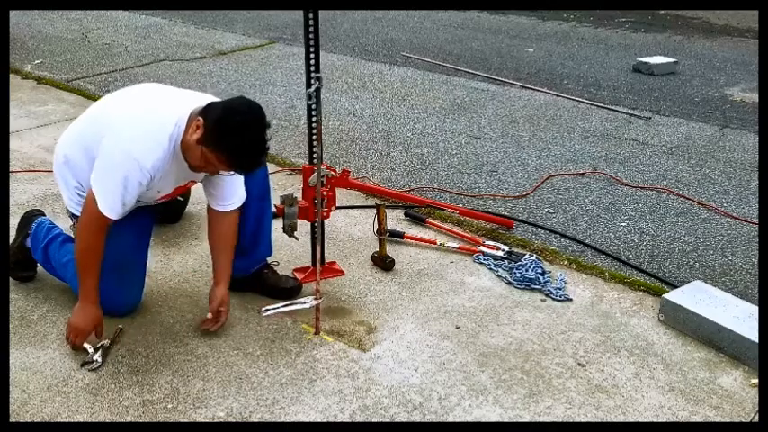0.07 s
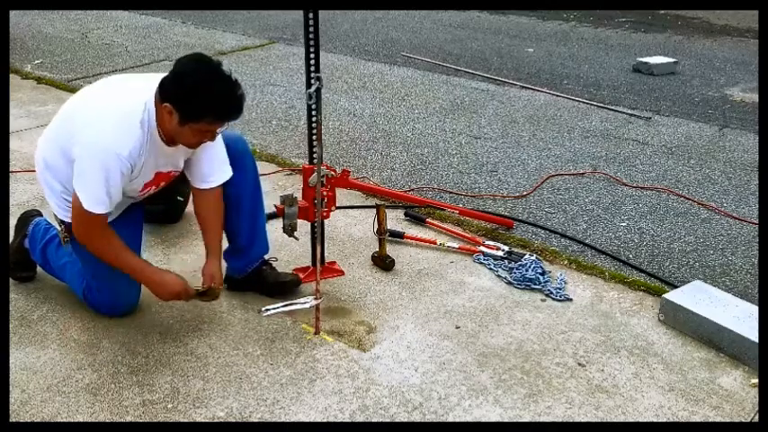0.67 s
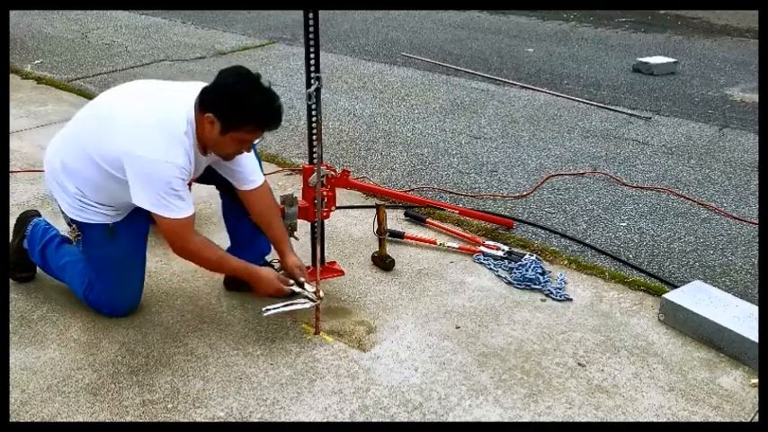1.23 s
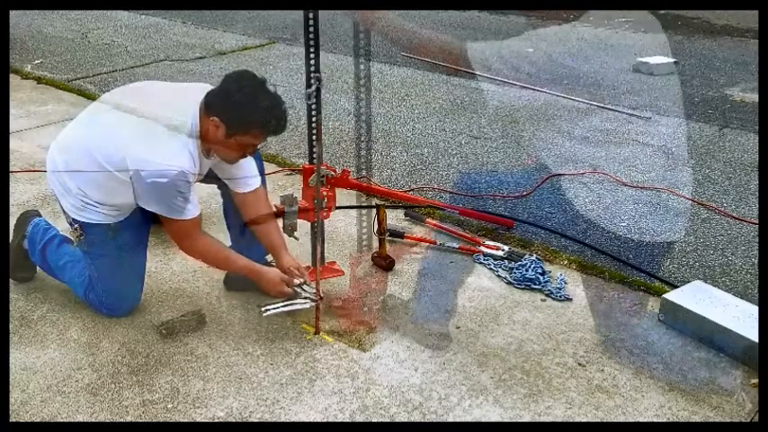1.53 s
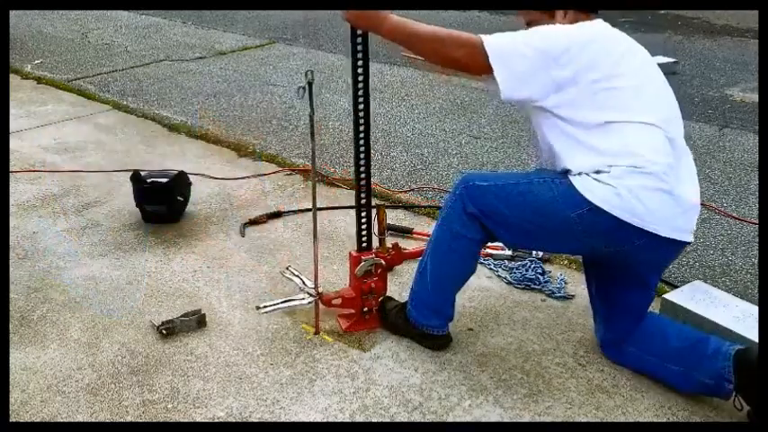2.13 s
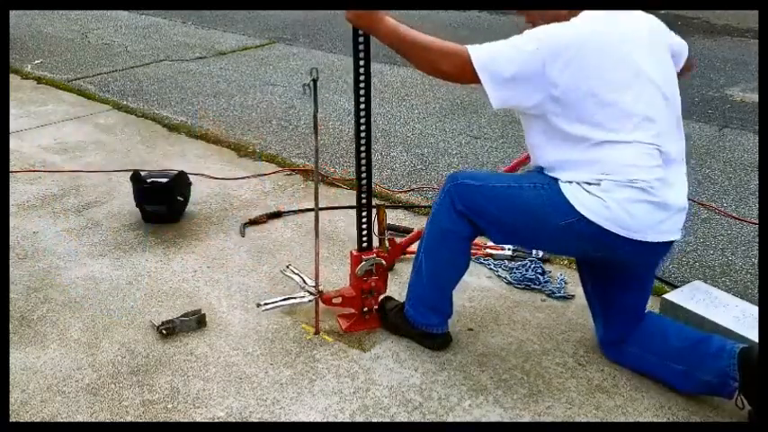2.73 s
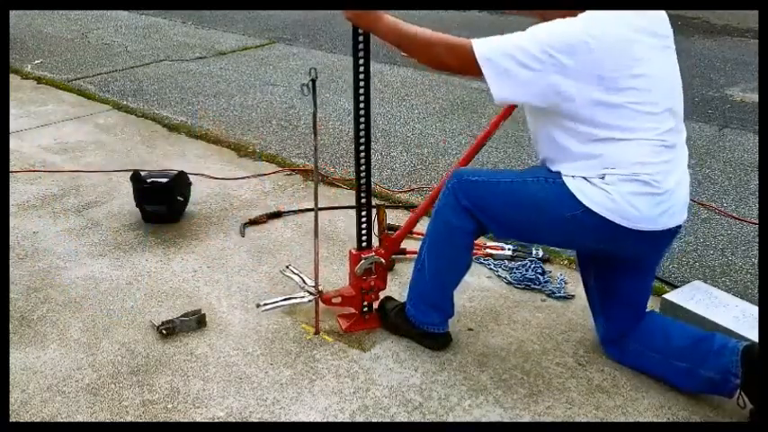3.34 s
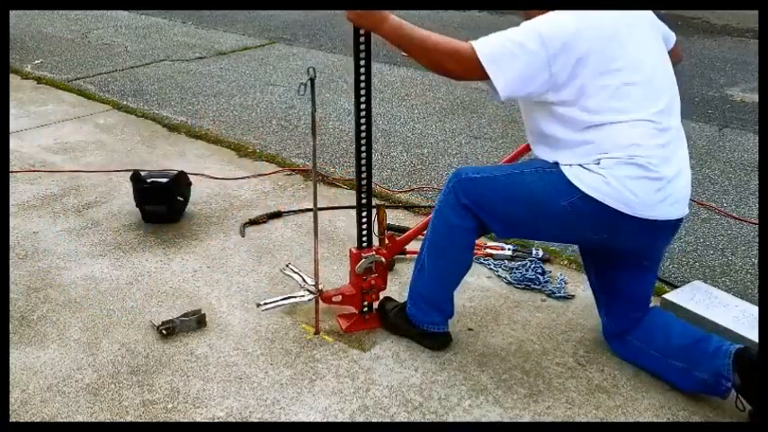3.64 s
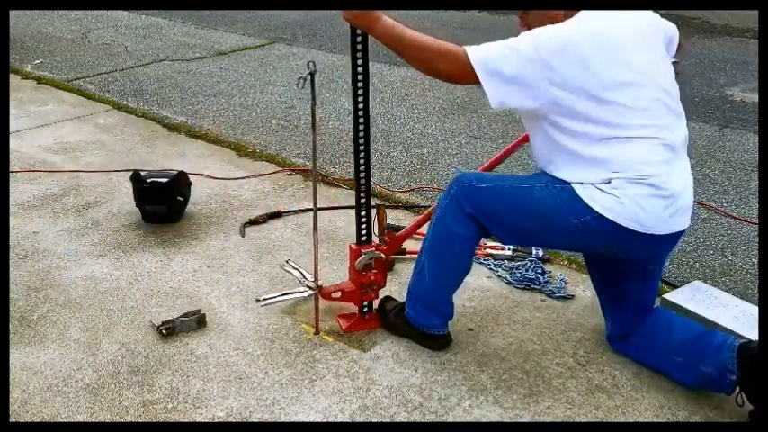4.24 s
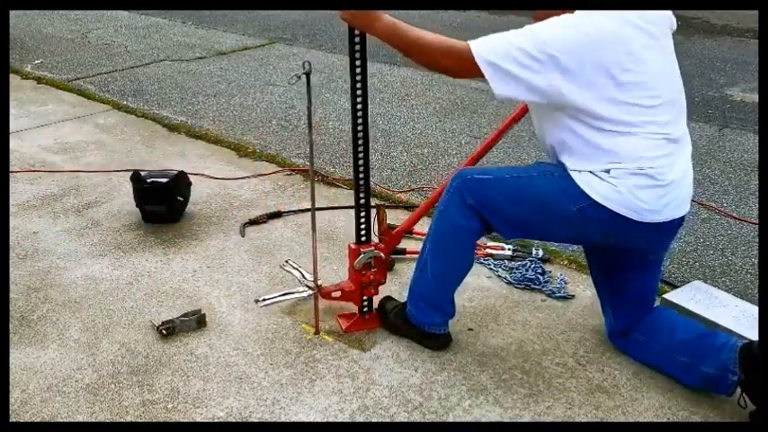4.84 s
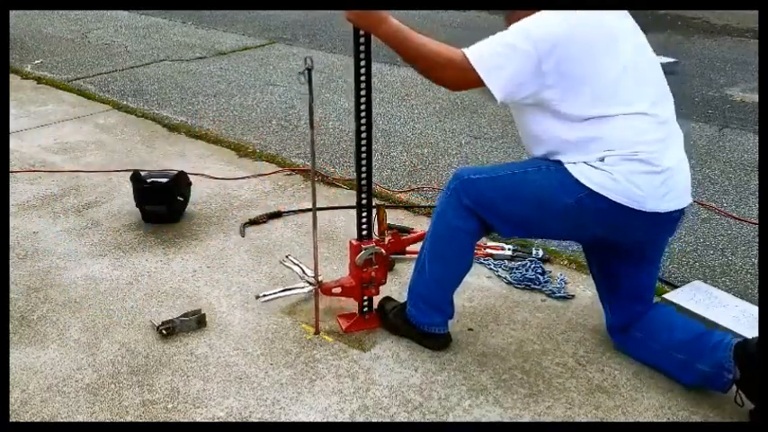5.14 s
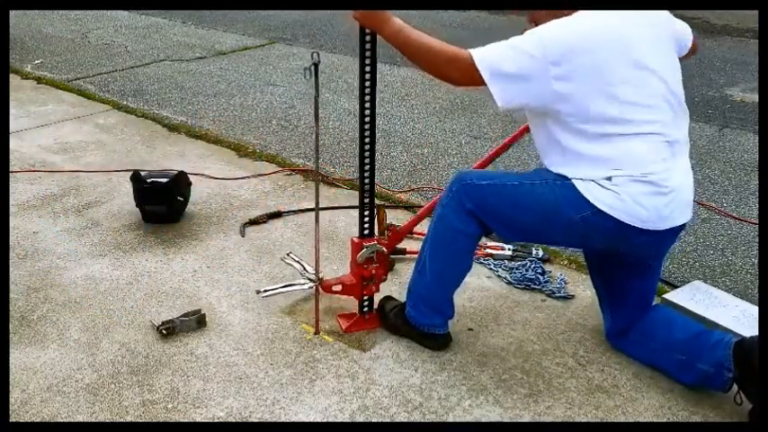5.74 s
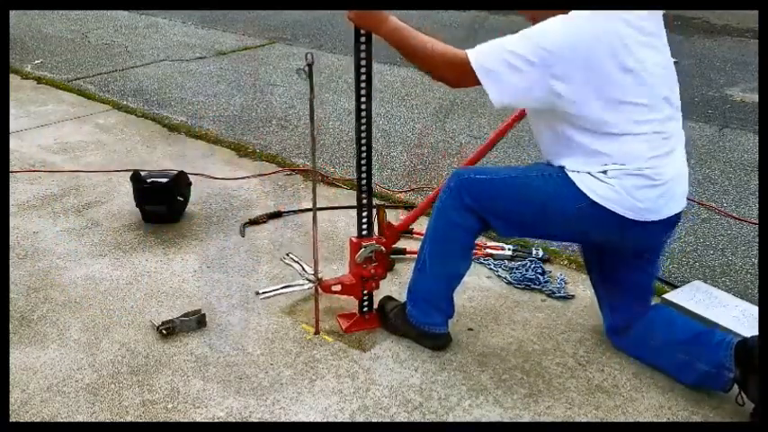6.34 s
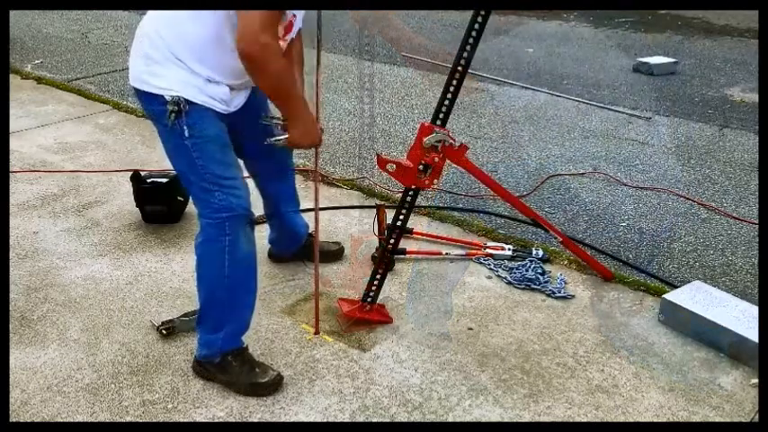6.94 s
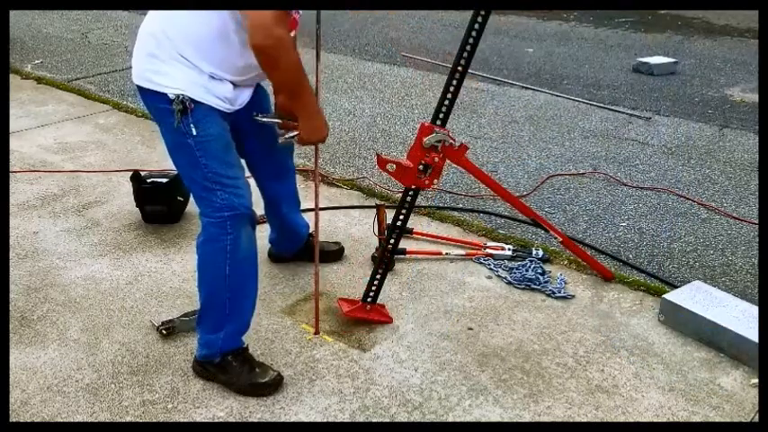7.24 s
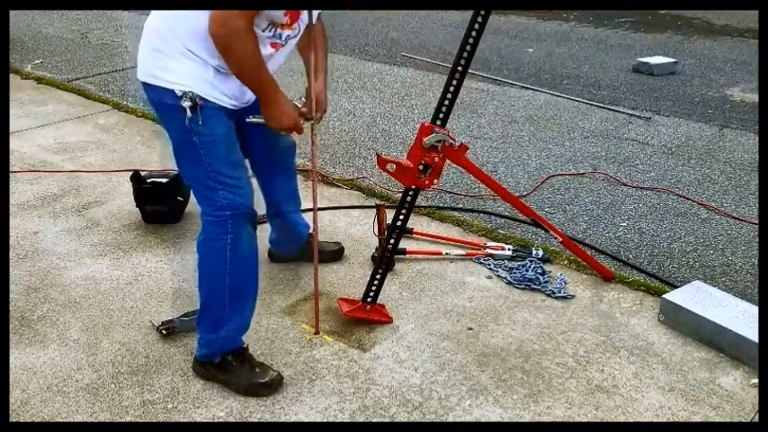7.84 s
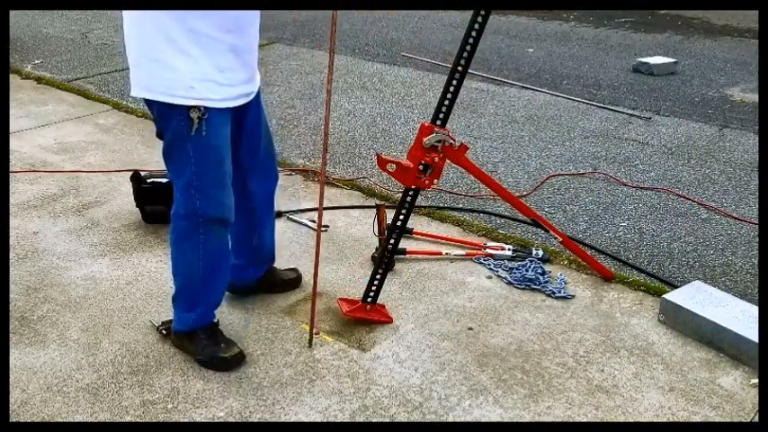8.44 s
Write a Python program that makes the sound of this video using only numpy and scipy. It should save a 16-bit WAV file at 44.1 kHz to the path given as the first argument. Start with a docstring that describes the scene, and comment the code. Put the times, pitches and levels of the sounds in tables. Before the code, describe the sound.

A steel jack is pumped outdoors, clanking, clicking and rattling, with pliers tapping and keys jingling over distant traffic.

```python
"""A steel farm jack draws a ground rod out, stroke by stroke: its climbing pin clicks, its linkage rattles, the
rod creaks under load and the carriage clanks into the next hole; at the end the jack is set down with a last
clank. Each impact excites the free modes of a steel part; each slide drives resonances by friction. First,
pliers scrape off the concrete and clamp on the rod, and keys jingle on the worker's belt as he pumps. The open
lot echoes faintly, over distant traffic and the drone of an engine."""
import sys
import numpy as np
from scipy import signal
from scipy.fft import rfft, irfft, next_fast_len
from scipy.io import wavfile
from scipy.ndimage import map_coordinates

SR = 44100
rng = np.random.default_rng(int(sys.argv[2]) if len(sys.argv) > 2 else 0)


def file_out(sig):
    """Save sig as 16-bit WAV at sys.argv[1]."""
    # one column per channel
    cols = np.atleast_2d(sig).T
    # limit, then scale
    lim = np.clip(cols, -1, 1)
    pcm = np.round(lim * 32767).astype(np.int16)
    wavfile.write(sys.argv[1], SR, pcm)


N = 383229
TIME = np.arange(N) / SR
AGE = np.arange(SR // 2) / SR  # seconds since an impact
STOP_S, TOP_HZ = 8.52, 15850  # end of the work; upper band limit

# Levels in the tables are relative; each source applies its own gain. carriage seats on the bar, and at last
# the jack is set down: start_s, level_db, knock_db, contact_hz, t60_s, touch_lead_s, touch_db
CLANKS = [(2.2362, -17, 1, 4140, 0.084, 0.013, -38.5), (3.858, -16, -2.5, 2300, 0.053, 0.0073, -43.5),
          (5.2553, -17.5, -4, 4240, 0.066, .015, -40), (6.8207, -15, 0.5, 2300, 0.053, 0.015, -32.5)]
# sprung pin slips off an edge and snaps over: start_s, level_db, contact_hz, slip_lead_s, slip_db
SNAPS = [(3.0241, -21, 4000, 0.0025, -31), (4.483, -23.5, 4440, 0.0038, -22),
         (5.9659, -19.5, 12600, 0.0079, -34)]
# slack handle and linkage knock: start_s, level_db, contact_hz
RATTLES = [(2.077, -37.5, 2220), (2.553, -28.5, 2100), (2.68, -38, 4380), (2.769, -34.5, 7700),
           (3.276, -31, 2010), (3.324, -27.5, 1690), (3.346, -23, 10780), (3.669, -40, 2270),
           (3.725, -31, 3940), (4.07, -33, 2400), (4.087, -29.5, 2040), (4.116, -36, 1910),
           (4.193, -27, 11800), (4.203, -28.5, 4230), (4.251, -37.5, 3570), (4.682, -32, 6930),
           (4.7, -29.5, 7100), (4.724, -34, 1130), (4.769, -24.5, 3970), (4.868, -29.5, 4000),
           (5.54, -35.5, 2170), (5.561, -31, 2020), (5.67, -30, 1160), (5.726, -33, 3500),
           (5.816, -32.5, 1010), (6.243, -28.5, 2120), (6.274, -27.5, 10750)]
# linkage chatters around each snap: offset_s, length_s, level_db
CHATTER = [(-.43, .23, -41.5), (0.115, .025, -49.5), (0.221, .09, -38)]
# rod jerks upward: centre_s, length_s, creak_db, thud_db
HEAVES = [(3.286, 0.034, -52, -51), (3.335, .03, -47, -37), (4.25, .3, -63, -63), (4.728, 0.04, -39, -39),
          (4.84, 0.31, -48.5, -62), (5.023, 0.041, -47.5, -73), (6.287, 0.15, -47.5, -49)]
# pliers touch ground, rod and their own jaws: start_s, level_db, contact_hz, t60_s
PLIER_TAPS = [(.403, -33.5, 5700, .055), (.415, -30, 9400, 0.037), (.6128, -20, 6280, 0.014),
              (.719, -40.5, 6200, 0.079), (1.169, -31, 4400, 0.057), (1.612, -38.5, 2310, 0.076),
              (1.672, -37, 2930, .08), (7.8, -29, 6540, 0.052), (8.025, -23.5, 7560, 0.062),
              (8.039, -31, 4230, 0.025)]
# pliers skip and fidget: start_s, length_s, level_db, contact_hz, t60_s
PLIER_FIDGETS = [(0.217, .1, -38, 6900, 0.015), (1.181, .26, -46, 8950, 0.059),
                 (1.635, 0.092, -38, 3600, .08)]
# keys swing together: start_s, level_db, clink_re_ring_db
JINGLES = [(3.468, -34.5, -25), (4.73, -29, -3.5), (4.961, -28.5, -15), (5.0146, -20.5, -20),
           (6.3125, -28, -10), (6.497, -27, -17), (6.6003, -12.5, -14), (6.7277, -25, -22),
           (7.2052, -28.5, -12.5), (7.2271, -20, -6), (7.426, -40.5, -1), (7.555, -28.5, -6),
           (7.9398, -23, -4.5), (8.0003, -20, -10), (8.2917, -17, -10), (8.3916, -21.5, -22.5)]

# free modes of each steel part: pitch_hz, level_db, t60_s
JACK_MODES = [(1018, -13.5, 0.035), (1595, -18, 0.16), (2340, -2.5, 0.16), (3700, -13, 0.092),
              (3810, 2, 0.067), (3900, -9, 0.4), (4580, -3, .1), (7300, -3.5, 0.16), (7870, 0.5, 0.06),
              (10300, -22, .06), (11470, -7, 0.056), (13700, -1.5, 0.048), (14330, 11.5, .06)]
PIN_MODES = [(4140, -19, 0.026), (8000, -2, 0.094), (10170, 11, 0.026), (9800, -3, 0.046),
             (12200, -13, 0.012), (12700, 5, .03), (13230, 2, .035)]
LINK_MODES = [(1080, -2, 0.11), (1850, -13.5, 0.12), (2240, -3.5, 0.33), (3800, -14.5, 0.11),
              (3900, -0.5, 0.18), (7340, -1, 0.13), (11300, -2, 0.07), (11600, -19, .06)]
PLIER_MODES = [(3670, 20, 0.079), (6800, -14, 0.017), (9450, -14, .2), (14800, -8, 0.048), (15400, -4, .05)]
KEY_MODES = [(14460, -1, 0.2), (14660, -1.5, 0.48), (14650, -10.5, 0.5), (14400, -8.5, .17),
             (15192, -19.5, 0.18), (15585, -2, 0.2)]
CLINK_MODES = [(1950, -20.5, 0.17), (2784, -4, 0.19), (3970, -4.5, 0.11), (4800, 8, 0.14),
               (5620, 5.5, 0.055), (7440, 0, 0.15)]
# spectra of each part's dense, short resonances: frequency_hz, density_db
JACK_BODY = [(200, -16), (550, -12.5), (800, -6), (1200, -0.5), (2300, 1), (3000, -5), (3850, -0.5),
             (5200, -4), (7000, -5), (8800, -11.5), (11500, -3.5), (15500, -15)]
PIN_BODY = [(300, -10), (800, -19), (1150, -2), (2600, -0.5), (4300, 6), (6000, -1.5), (7800, 3.5),
            (9200, -4), (10500, 0.5), (12600, 8.5), (15500, 3.5)]
LINK_BODY = [(200, -7), (600, 0.5), (1100, 5), (1500, 3.5), (2100, 4.5), (3100, 2), (3900, 6), (5500, -1.5),
             (7200, 0.5), (9000, -8.5), (12000, -6), (15500, -9.5)]
PLIER_BODY = [(300, -19), (1400, -5.5), (2500, 0), (3700, -5), (4300, 3.5), (6600, 5.5), (8400, 0.5),
              (11000, 1), (15500, 2)]
KEY_BODY = [(700, -24), (2000, 1), (4700, 2), (6500, 4.5), (9200, 0), (12500, 5.5), (15500, -13)]
# resonances driven by friction: centre_hz, width_hz, level_db
CREAK_PEAKS = [(1100, 320, -9.5), (2270, 660, -7.5), (3880, 230, 1.5), (4084, 90, 3.5), (4600, 120, -12),
               (7100, 610, -12), (12000, 3400, -11)]
PULL_PEAKS = [(945, 460, 5), (2105, 65, 12.5), (2880, 1400, -1), (4750, 530, 6.5), (6170, 3100, -1)]
DRAG_PEAKS = [(2140, 1300, -12), (4900, 1200, -0.5), (6240, 820, 3.5), (8400, 830, 2), (9660, 52, 12.5),
              (11400, 2000, -7), (15000, 2000, -6.5)]
# noise spectra of the ground thud, traffic and open air: frequency_hz, density_db
THUD_SPECTRUM = [(60, -18), (180, -7), (320, -2), (600, -14), (1200, -21), (3000, -26.5)]
RUMBLE_SPECTRUM = [(12, -56), (20, -40), (43, -5.5), (59, 1.5), (81, -5.5), (109, 6), (124, -8.5),
                   (151, -7.5), (228, -11), (330, -17.5), (414, -19.5), (439, -21.5), (478, -20.5),
                   (600, -29.5), (780, -32.5), (1320, -120)]
AIR_SPECTRUM = [(150, 5), (400, 7.5), (600, 5.5), (1000, -3), (2000, -4.5), (3500, -12), (4900, -12),
                (7800, -13.5), (8300, -21.5), (12000, -19.5), (15500, -17.5)]

# reverberation time of the lot: frequency_hz, t60_s
LOT_DECAY = [(200, 0.099), (2000, 0.48), (6000, 0.56), (14000, 0.39)]
# colour of its echoes: frequency_hz, gain_db
ECHO_COLOUR = [(1000, 1), (6500, -0.5), (9000, 0.5), (15000, -4.5)]
# spectral lines of the far engine: pitch_hz, level_db
ENGINE_LINES = [(57, -45), (109, -53.5), (121, -48), (241, -61.5), (357, -66.5), (413, -71), (475, -66)]
# swells of the background: centre_s, length_s, gain_db
SWELLS = [(1.55, 0.84, 3.5), (6.76, 1, 2.5)]
# likeness of left and right: frequency_hz, correlation
COHERENCE = [(50, 0.94), (150, 0.86), (300, 0.62), (600, 0.033), (1500, 0.077), (4000, 0.069),
             (14000, 0.13)]


def jack_clanks(light_knock_db=4, settle_s=.016):
    """Impact and rebound: the carriage touches the bar, seats with a clank and settles once more; the last
    clank is the jack being set down."""
    hits = []
    for s, db, knock_db, hz, t60, lead_s, touch_db in CLANKS:
        touch = (s - lead_s, touch_db, light_knock_db, hz, .12)
        settle = (s + settle_s, db - 17, light_knock_db, hz, .076)
        hits += [touch, (s, db, knock_db, hz, t60), settle]
    return impacts(hits, JACK_BODY, JACK_MODES, gain_db=3, blunt_db=-8, flutter_db=-.5,
                   ring_db=-9.5, contact_db=1.5, crest_db=6, rise_s=.0003)


def climbing_pin(slip_hz=12300, t60=.04):
    """Release of stored spring energy: the pin slips off an edge, then snaps over."""
    hits = []
    for s, db, hz, lead_s, slip_db in SNAPS:
        hits += [(s - lead_s, slip_db, 0, slip_hz, t60), (s, db, 0, hz, t60)]
    return impacts(hits, PIN_BODY, PIN_MODES, gain_db=3, blunt_db=5.5, flutter_db=1,
                   ring_db=-10.5, contact_db=5, crest_db=-2.5, rise_s=.00025)


def linkage(rattle_t60=.074):
    """Backlash: slack joints knock and chatter as the handle is lifted, turned back and loaded."""
    touches = [(s, db, hz, rattle_t60) for s, db, hz in RATTLES]
    for snap_s, *_ in SNAPS:
        for offset_s, length_s, db in CHATTER:
            touches += flurry(snap_s + offset_s, length_s, db, hz=3250, t60=.11, count=3)
    hits = with_knock(touches, db_per_octave=-8)
    return impacts(hits, LINK_BODY, LINK_MODES, gain_db=-2.5, blunt_db=5, flutter_db=4.5,
                   ring_db=-20.5, contact_db=11.5, crest_db=-4.5, rise_s=.001)


def rod():
    """Stick-slip: the rod creaks up in jerks that thud in the ground, and at last slides out by hand."""
    centre_s, length_s, creak_db, thud_db = np.transpose(HEAVES)
    strain = np.exp(-(2 * (TIME - centre_s[:, None]) / length_s[:, None]) ** 2)
    creak = amp(creak_db) @ strain * friction(CREAK_PEAKS, slip_rate_hz=80, slip_db=12.5)
    thud = amp(thud_db) @ strain * noise(lambda hz: along(THUD_SPECTRUM, hz), N)
    pull = slide_envelope(start_s=7.405, length_s=1.13, db=-54.5, fall_db_per_s=3.6)
    return creak + thud + pull * friction(PULL_PEAKS, slip_rate_hz=110, slip_db=2.5)


def pliers():
    """Sliding friction, then light impacts: the pliers drag over concrete, tap and clamp."""
    drag = slide_envelope(start_s=.19, length_s=.28, db=-47.5, fall_db_per_s=31)
    scrape = drag * friction(DRAG_PEAKS, slip_rate_hz=260, slip_db=7)
    fidgets = [touch for row in PLIER_FIDGETS for touch in flurry(*row, count=4)]
    hits = with_knock(PLIER_TAPS + fidgets, db_per_octave=-10)
    return scrape + impacts(hits, PLIER_BODY, PLIER_MODES, gain_db=-1.5, blunt_db=25.5, flutter_db=4,
                            ring_db=-27, contact_db=11.5, crest_db=-8, rise_s=.00035)


def keys(rebound_s=.022, dangle_s=.26, dangle_db=-9.5, fall_db_per_s=34.5, touches=3):
    """Collisions of hanging plates: keys clink, rebound, then dangle and touch ever more softly."""
    track = np.zeros((2, N))
    for s, db, clink_db in JINGLES:
        for delay, gain_db in [(0, -1), (rebound_s * rng.uniform(.25, 2), -14)]:
            clink = impact(KEY_BODY, CLINK_MODES, knock_db=2, contact_hz=15200, t60=.11, ring_db=-5,
                           contact_db=14, crest_db=.5, rise_s=.00118, contact_width_hz=370)
            add(track, s + delay, amp(db + gain_db) * (key_chime() + amp(clink_db - 1) * clink))
        for delay in scatter(dangle_s, touches):
            add(track, s + delay, amp(db + dangle_db - fall_db_per_s * delay) * key_chime())
    return track


def key_chime(detune_hz=25, sway_db=-.5, rise_s=.0017):
    """Free vibration of keys: a little different at each touch, fluttering as they turn."""
    sway = map_coordinates(rng.standard_normal(40), [AGE * 70]) * np.tanh(AGE / .05)
    modes = [(hz + detune_hz * rng.standard_normal(), db, t60) for hz, db, t60 in KEY_MODES]
    return ring(modes) * (1 - np.exp(-AGE / rise_s)) * amp(sway_db * sway)


def impacts(hits, body, modes, gain_db, blunt_db, flutter_db, **timbre):
    """Superposition of one part's impacts; loose parts chatter, so each decay is uneven."""
    track = np.zeros((2, N))
    for s, db, knock_db, contact_hz, t60 in hits:
        flutter = map_coordinates(rng.standard_normal(130), [AGE * 250]) * np.tanh(AGE / .005)
        sound = impact(body, modes, knock_db + blunt_db, contact_hz, t60, **timbre)
        add(track, s, amp(db + gain_db + flutter_db * flutter) * sound)
    return track


def impact(body, modes, knock_db, contact_hz, t60, ring_db, contact_db, crest_db, rise_s,
           contact_width_hz=150):
    """Impulse response of steel: a hard crack, a crash of dense resonances and ringing free modes."""
    uneven_db = 2.8 * rng.standard_normal(120)

    def colour_db(hz):
        # the free modes stand out of the crash
        crests = sum(amp(db + crest_db) / (1 + ((hz - mode_hz) / 70) ** 2) for mode_hz, db, _ in modes)
        # the struck spot favours one resonance and skews the rest
        spot = contact_db / (1 + ((hz - contact_hz) / contact_width_hz) ** 2)
        skew = np.interp(hz, np.linspace(0, SR / 2, len(uneven_db)), uneven_db)
        knock = knock_db / (1 + (hz / 3000) ** 2)  # a blunt hit is heavier in the low range
        return along(body, hz) + 20 * np.log10(1 + crests) + spot + skew + knock

    crash = noise(colour_db, len(AGE)) * fade(AGE, t60)
    crack = amp(-5) * noise(lambda hz: along(body, hz), len(AGE)) * fade(AGE, t60=.014)
    return (crack + crash + amp(ring_db) * ring(modes)) * (1 - np.exp(-AGE / rise_s))


def ring(modes, spread_rad=.91):
    """Modal superposition: damped sines of random strength, at a different phase in each channel."""
    hz, db, t60 = np.transpose(modes)
    gain = amp(db + 2 * rng.standard_normal(len(hz)))
    phase = rng.uniform(0, 2 * np.pi, len(hz)) + spread_rad * rng.standard_normal((2, len(hz)))
    waves = np.exp(2j * np.pi * hz[:, None] * AGE) * fade(AGE, t60[:, None])
    return ((gain / np.linalg.norm(gain) * np.exp(1j * phase)) @ waves).imag


def with_knock(touches, db_per_octave):
    """Spectral tilt of each contact: the higher its spot rings above 1 kHz, the less it knocks."""
    return [(s, db, db_per_octave * np.log2(hz / 1000), hz, t60) for s, db, hz, t60 in touches]


def flurry(start_s, length_s, db, hz, t60, count, spread_octaves=.45):
    """Intermittent contact: small touches, random in time, level and pitch."""
    times = start_s + scatter(length_s, count)
    return [(s, db + 2 * louder, hz * 2 ** (spread_octaves * higher), t60)
            for s, (louder, higher) in zip(times, rng.standard_normal((count, 2)))]


def friction(peaks, slip_rate_hz, slip_db, grains_per_s=900):
    """Forced vibration: uneven slips over grit drive a few resonances; rms 1."""
    def resonances(hz):
        return sum((-1) ** k * amp(db) * 1j * hz * width / (centre ** 2 - hz ** 2 + 1j * hz * width)
                   for k, (centre, width, db) in enumerate(peaks))

    roughness = rng.standard_normal((2, N))
    grit = 7 * rng.standard_normal(N) * (rng.random(N) < grains_per_s / SR)
    slips = (roughness + grit) * amp(slip_db * np.tanh(wobble(slip_rate_hz)))
    return unit(filtered(slips, resonances))


def slide_envelope(start_s, length_s, db, fall_db_per_s, attack_s=.046, release_s=.01):
    """Breakaway friction: a slide scrapes hardest as it breaks free, then slows and lets go."""
    t = np.clip(TIME - start_s, 0, length_s)
    breakaway_db = 11 * np.exp(-t / .11)
    gate = np.minimum(t / attack_s, 1) * np.minimum((length_s - t) / release_s, 1)
    return amp(db + breakaway_db - fall_db_per_s * t) * gate


def lot_echo(sound, build_s=.0033, wall_s=.068, wall_db=-1):
    """Scattering from parked things: a diffuse tail that swells briefly when a wall answers."""
    hz, t, spectrum = signal.stft(rng.standard_normal((2, SR)), SR, nperseg=256)
    tail = signal.istft(spectrum * fade(t, along(LOT_DECAY, hz)[:, None]), SR, nperseg=256)[1]
    age = np.arange(tail.shape[1]) / SR
    wall = amp(wall_db) * (age > wall_s) * fade(abs(age - wall_s), t60=.062)
    tail *= 1 - np.exp(-age / build_s) + wall
    echo = signal.fftconvolve(sound, tail / np.linalg.norm(tail[0]), axes=1)[:, :N]
    return filtered(echo, lambda hz: amp(along(ECHO_COLOUR, hz)))


def engine(waver_db=2.73, waver_rad=.98):
    """Line spectrum of a far engine, wavering in level and phase as it propagates."""
    return sum(amp(db - 1 + waver_db * wobble(5)) * np.sin(2 * np.pi * hz * TIME + waver_rad * wobble(6))
               for hz, db in ENGINE_LINES)


def air(level_db=-52.5, calm_until_s=1.28, calm_treble_db=-6, hush_db=-5):
    """Broadband ambient noise: quieter and duller at first, and hushed when the work ends."""
    calm = (1 - np.tanh((TIME - calm_until_s) / .091)) / 2
    dull = amp(-1) * noise(lambda hz: along(AIR_SPECTRUM, hz) + calm_treble_db * hz / TOP_HZ, N)
    bright = noise(lambda hz: along(AIR_SPECTRUM, hz), N)
    blend = np.sqrt(calm) * dull + np.sqrt(1 - calm) * bright
    return amp(level_db + hush_db * (TIME > STOP_S)) * blend


def town(fade_start_s=8.5, fade_db_per_s=56):
    """Incoherent sum of traffic rumble, air and engine; together they drift, swell twice and fade."""
    swell_db = sum(db * np.exp(-(2 * (TIME - s) / length_s) ** 2) for s, length_s, db in SWELLS)
    drift_db = .5 * wobble(2.86)
    fade_db = fade_db_per_s * np.maximum(TIME - fade_start_s, 0)
    traffic = amp(-43) * noise(lambda hz: along(RUMBLE_SPECTRUM, hz), N)
    return amp(swell_db + drift_db - fade_db) * (traffic + air() + engine())


def noise(colour_db, size):
    """Partly coherent stereo noise of rms 1, more alike in the bass than in the treble."""
    def response(hz):
        angle = np.arccos(along(COHERENCE, hz)) / 2
        return amp(colour_db(hz)) * np.array([np.cos(angle), np.sin(angle)])

    mid, side = filtered(rng.standard_normal((2, size)), response)
    return unit(np.array([mid + side, mid - side]))


def amp(db):
    """Amplitude ratio from decibels."""
    return 10 ** (np.asarray(db) / 20)


def unit(x):
    """Normalisation to rms 1."""
    return x / np.sqrt(np.mean(x ** 2) + 1e-20)


def fade(t, t60):
    """Exponential damping, 60 dB down at t60."""
    return amp(-60 * t / t60)


def along(points, hz):
    """Interpolation of (frequency_hz, value) points on a log axis."""
    knots_hz, values = np.transpose(points)
    return np.interp(np.log(hz + 1), np.log(knots_hz + 1), values)


def wobble(rate_hz):
    """Smooth random modulation with rate_hz knots a second."""
    return map_coordinates(rng.standard_normal(int(N * rate_hz / SR) + 4), [TIME * rate_hz])


def scatter(length_s, count):
    """Timing jitter: one random instant in each of count equal slots."""
    return length_s * (np.arange(count) + rng.random(count)) / count


def filtered(x, response):
    """Linear filtering: the spectrum times a complex frequency response."""
    size = next_fast_len(x.shape[-1] + 4096)
    return irfft(rfft(x, size) * response(np.fft.rfftfreq(size, 1 / SR)), size)[..., :x.shape[-1]]


def add(track, start_s, sound):
    """Superposition of a sound on the track at start_s."""
    part = track[:, round(start_s * SR):][:, :sound.shape[-1]]
    part += sound[:, :part.shape[-1]]


def scene(echo_db=-13, left_db=1.25, lag_s=.00005):
    """Time and level differences place the work a little to the left; it stops just as the town begins to fade."""
    jack = linkage() + jack_clanks() + climbing_pin()
    work = jack + pliers() + rod() + keys()
    work = filtered(work, lambda hz: np.exp(np.array([[1j], [-1j]]) * np.pi * hz * lag_s))
    gate = np.clip((STOP_S - TIME) / .0063, 0, 1)
    foreground = (work + amp(echo_db) * lot_echo(work)) * gate
    return foreground * amp([[left_db], [-left_db]]) + town() * amp([[.8], [-.8]])


def record(dry):
    """Band limiting: a steep low-pass removes the treble above TOP_HZ."""
    return filtered(dry, lambda hz: 1 / np.sqrt(1 + (hz / TOP_HZ) ** 200))


dry = scene()
out = record(dry)
file_out(out)
```